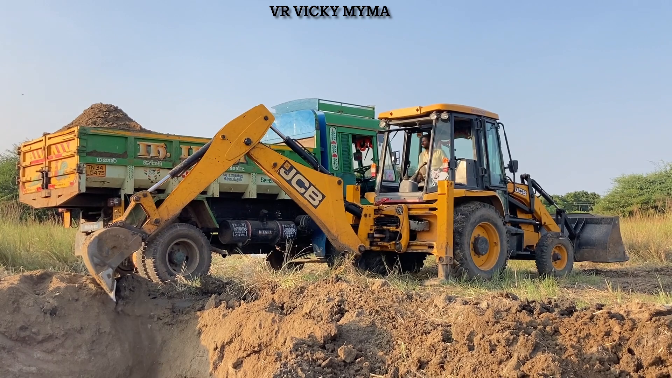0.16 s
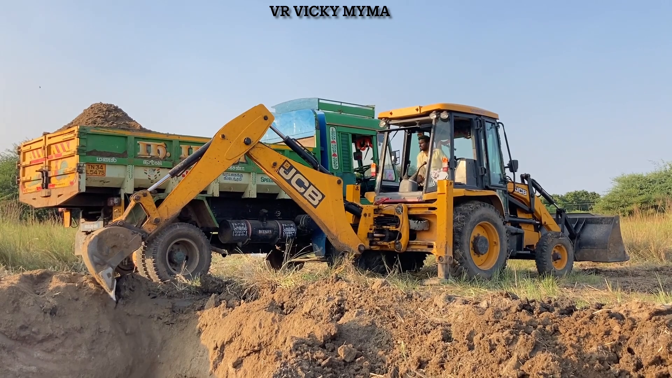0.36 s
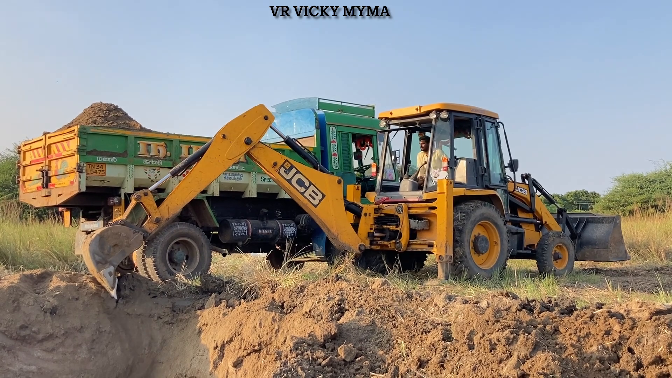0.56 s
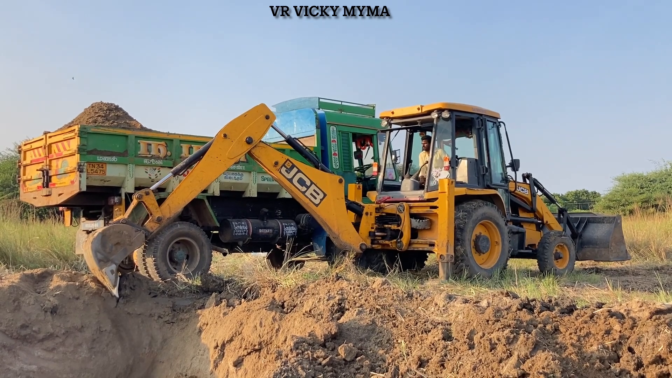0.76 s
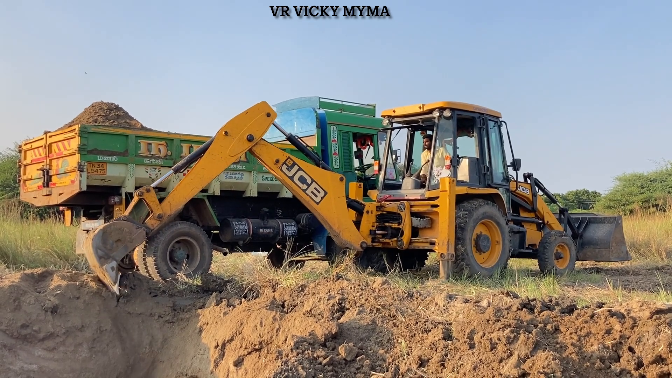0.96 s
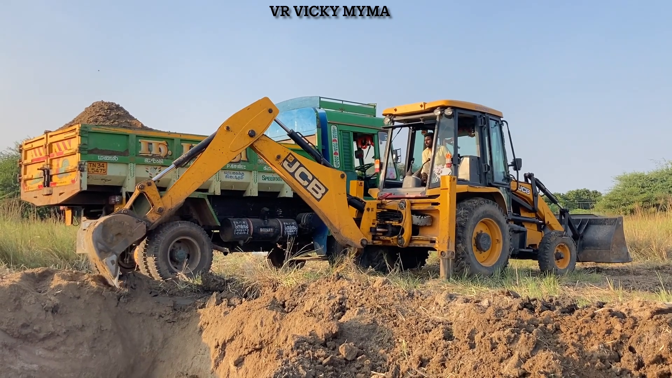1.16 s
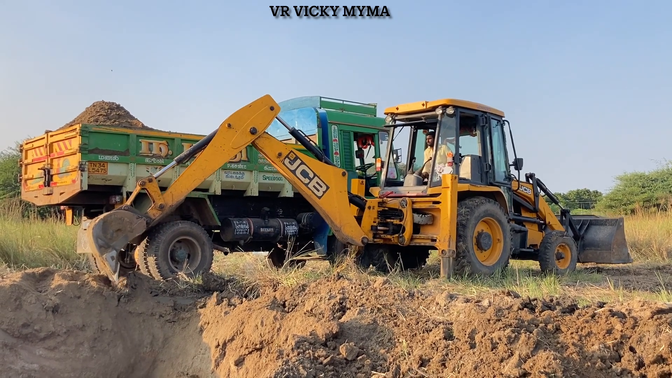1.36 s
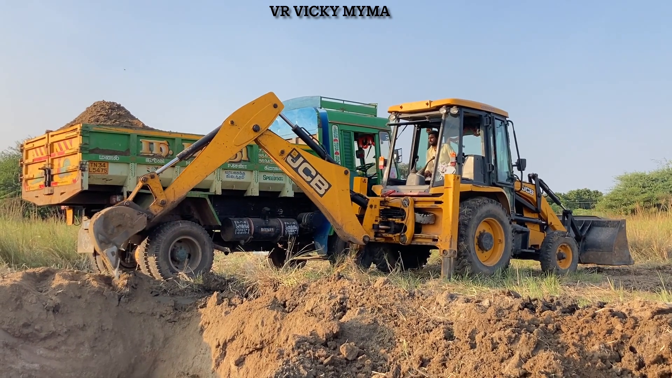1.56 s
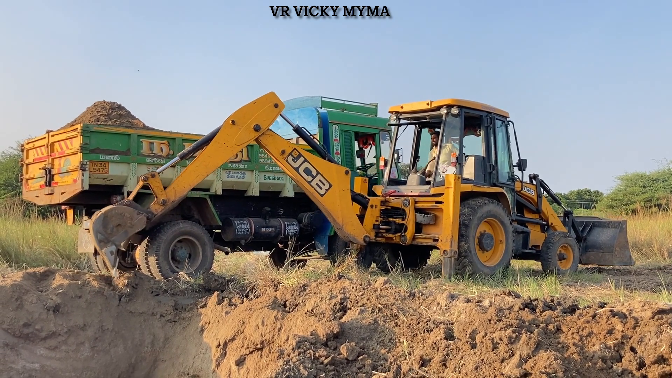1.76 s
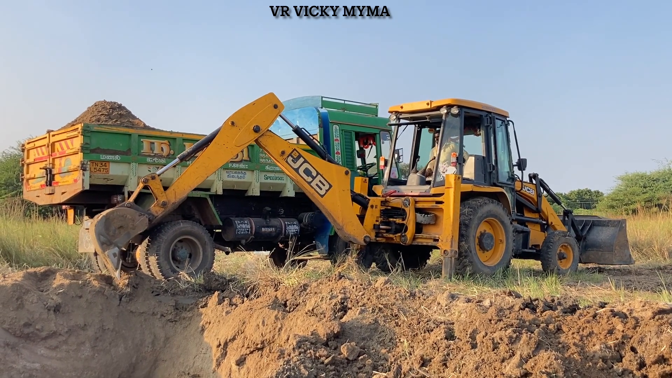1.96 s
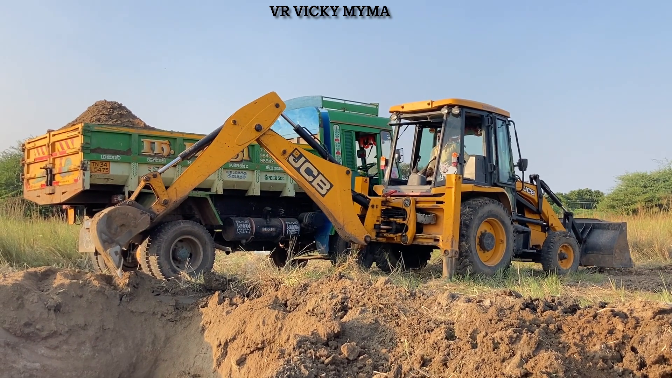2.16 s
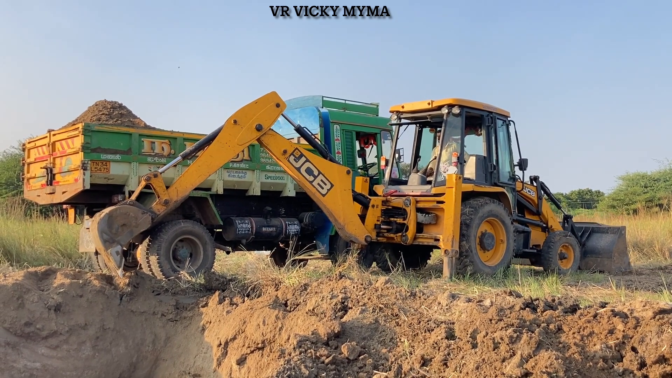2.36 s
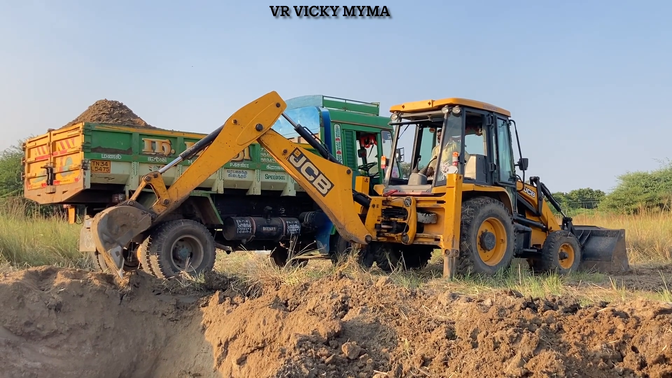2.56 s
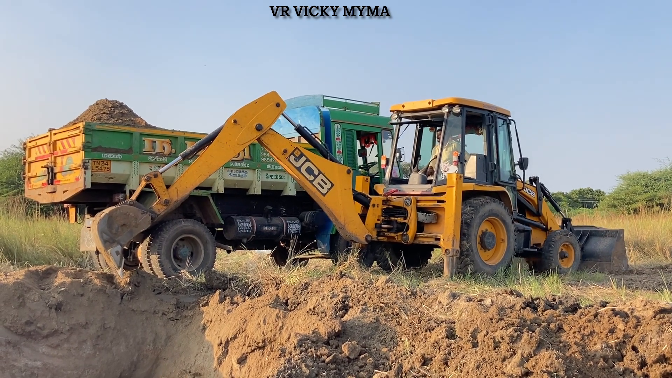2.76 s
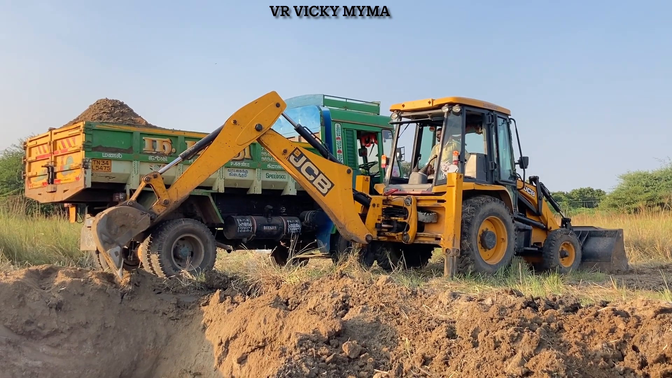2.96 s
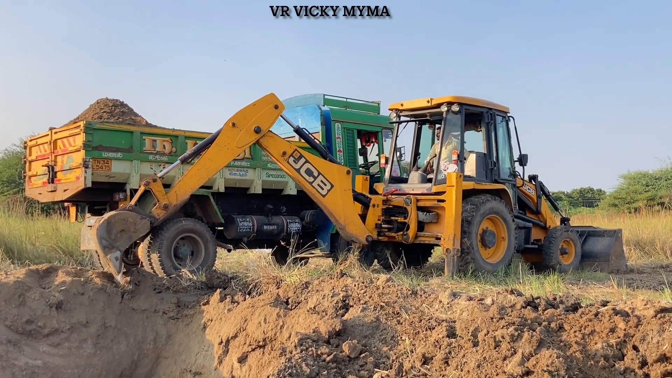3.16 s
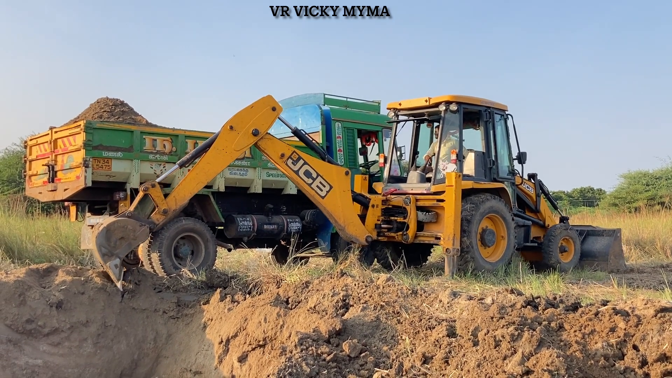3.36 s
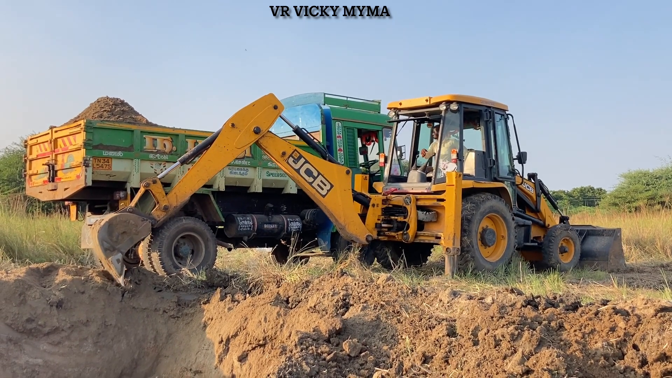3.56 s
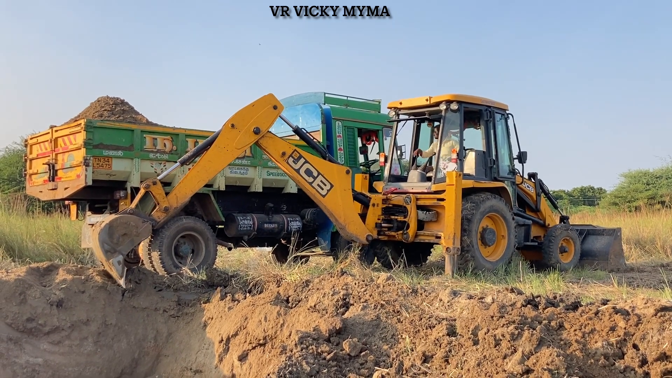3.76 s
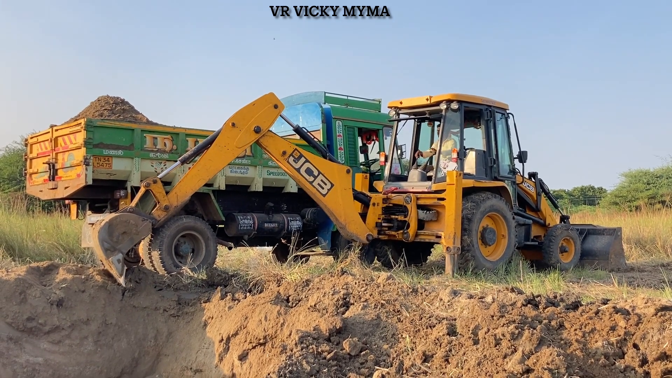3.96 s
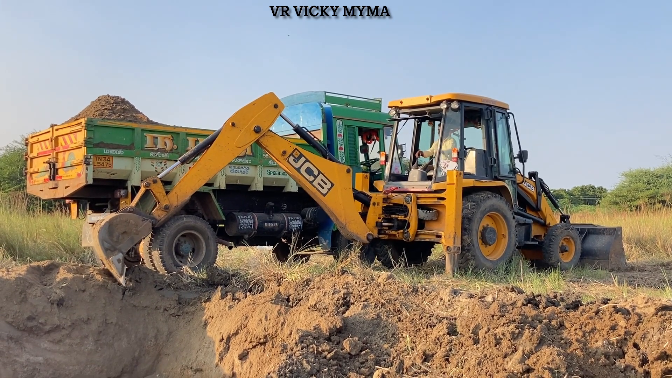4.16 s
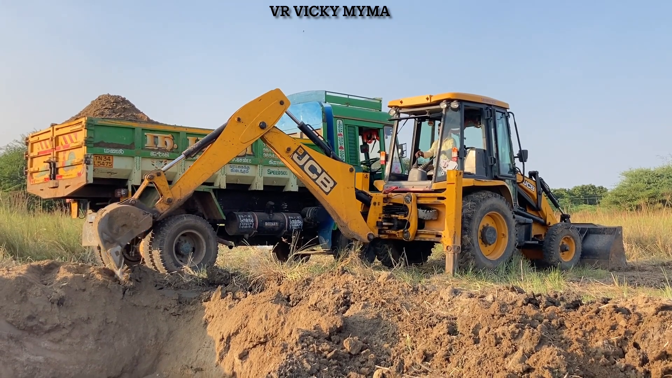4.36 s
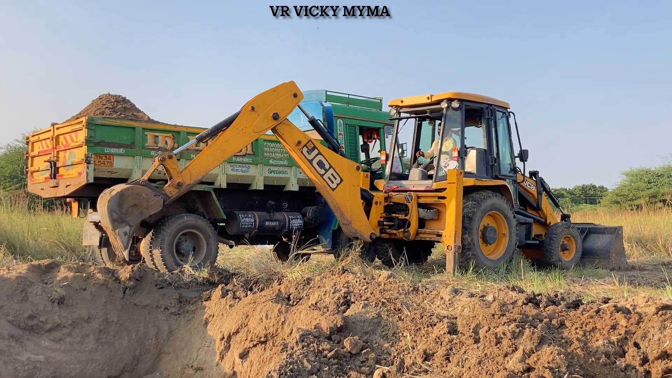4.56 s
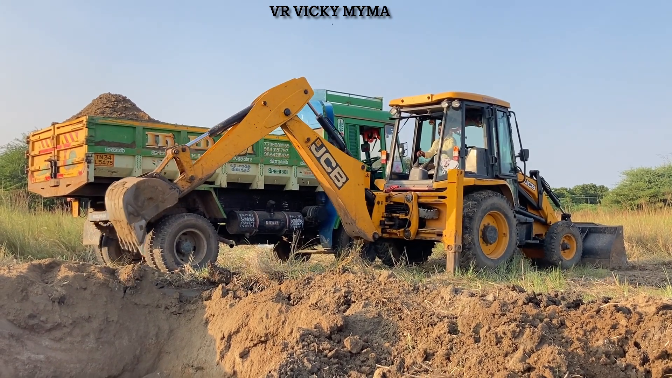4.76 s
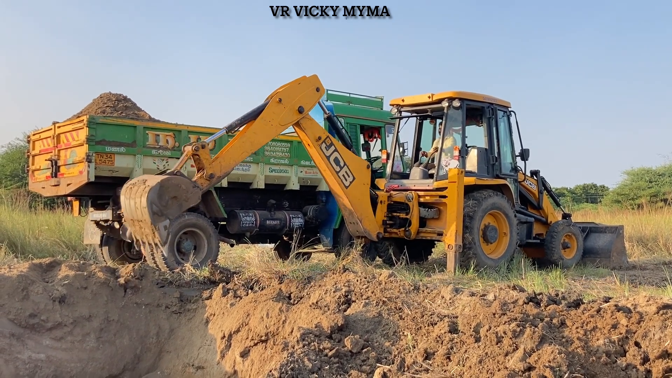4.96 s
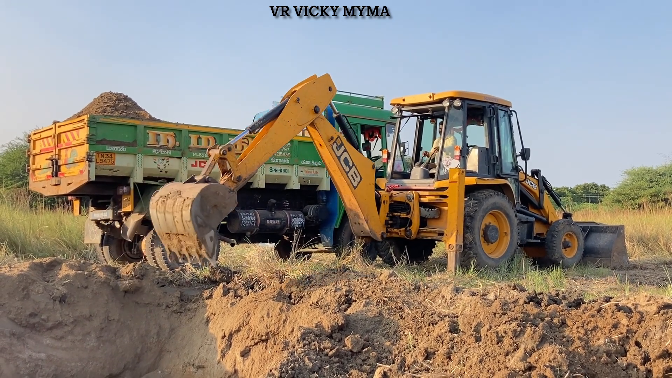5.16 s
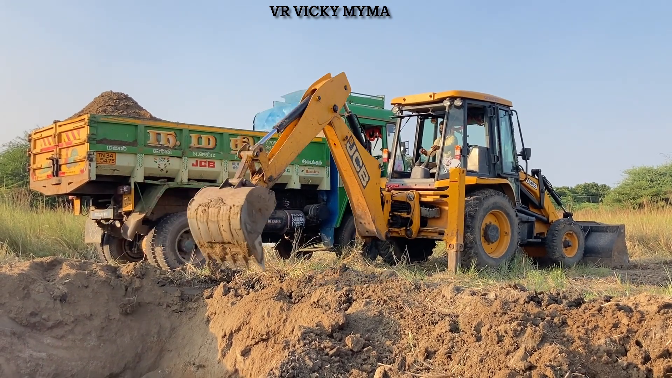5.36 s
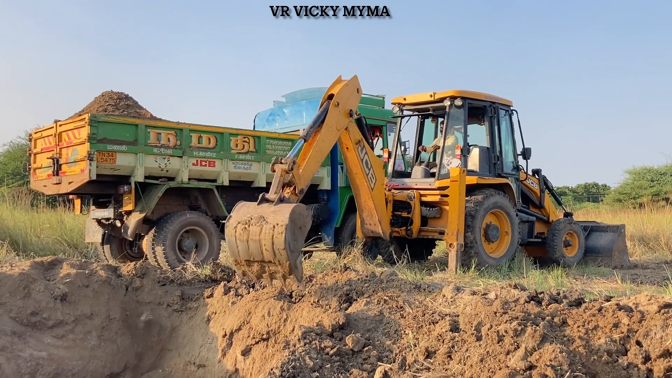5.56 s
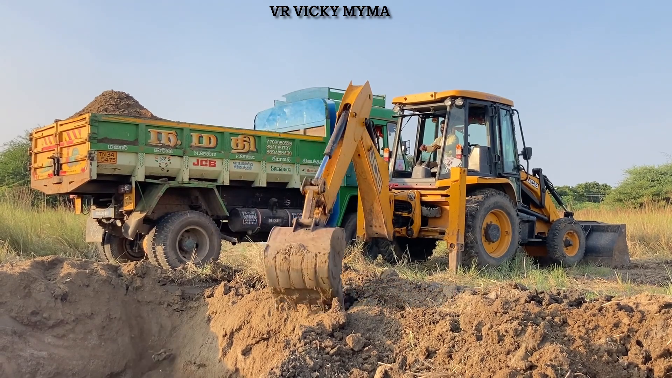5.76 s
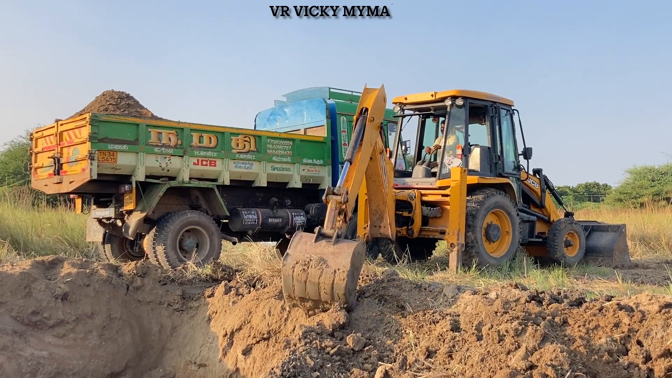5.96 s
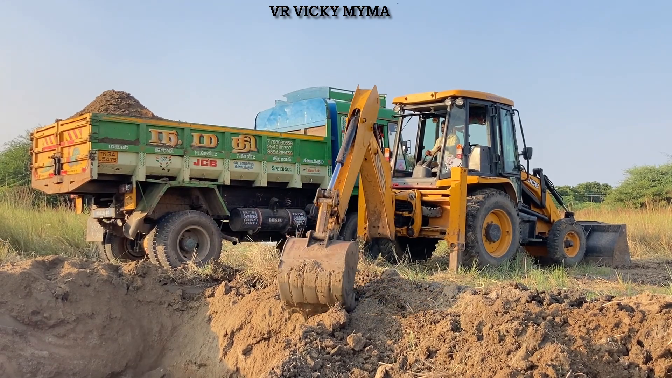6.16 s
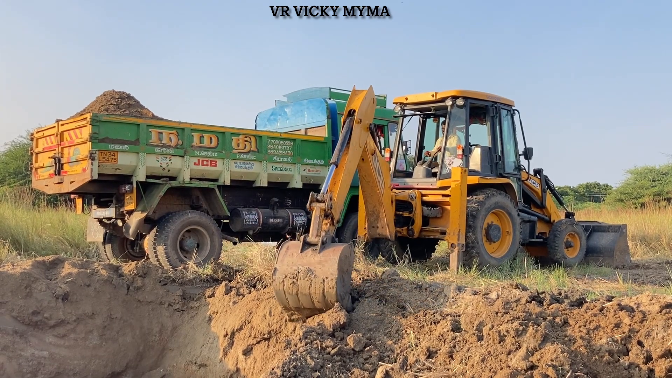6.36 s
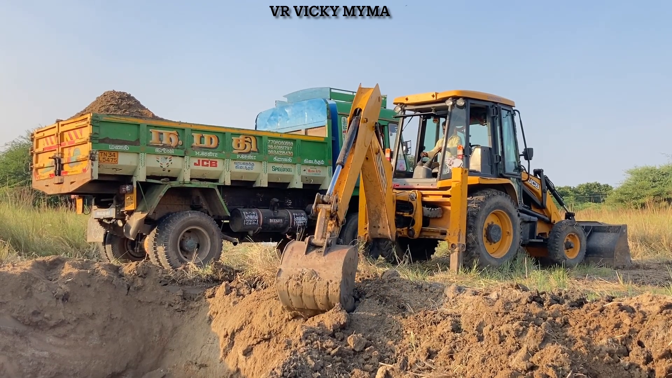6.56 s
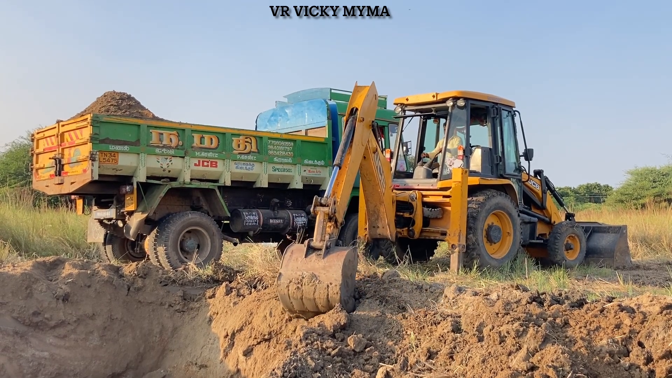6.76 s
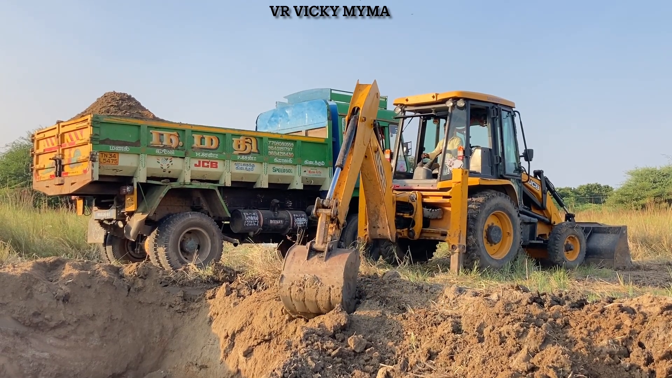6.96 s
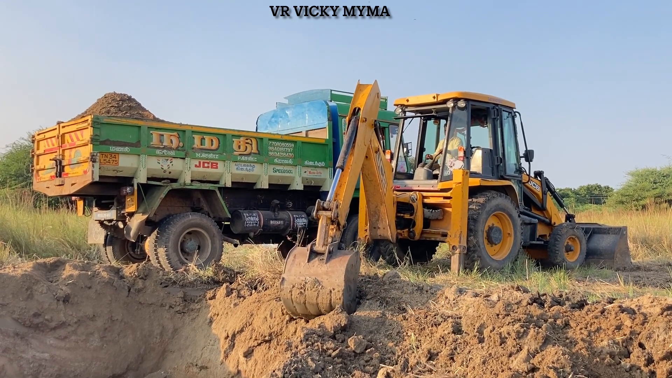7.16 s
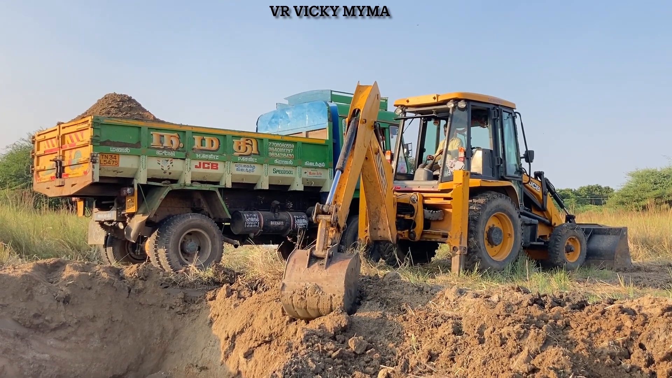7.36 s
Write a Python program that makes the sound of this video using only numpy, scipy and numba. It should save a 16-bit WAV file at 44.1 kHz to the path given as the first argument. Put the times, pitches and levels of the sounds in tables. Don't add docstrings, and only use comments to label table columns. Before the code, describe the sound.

Clattering diesel digger at work outdoors, revs dipping and surging, hydraulic hiss, small bucket knocks, then a loud metallic bang and gritty scraping.

```python
import sys
import numpy as np
from scipy import signal
from scipy.fft import rfft, irfft
from scipy.io import wavfile
from scipy.ndimage import uniform_filter1d
from numba import njit

SR = 44100
rng = np.random.default_rng(int(sys.argv[2]) if len(sys.argv) > 2 else 0)


def voltage_ratio(decibels):
    exponent = np.asarray(decibels, float) / 20
    return 10 ** exponent


def materialize(psi):
    bounded = np.clip(np.atleast_2d(psi).T, -1, 1)
    quanta = np.round(bounded * 32767).astype(np.int16)
    wavfile.write(sys.argv[1], SR, quanta)


N = 326781
SECONDS = np.arange(N) / SR

# exhaust puff in dB, block knock in dB.
CYLINDERS = [
    (2, -7),
    (2.5, -12.5),
    (0.5, -10),
    (4, -18),
]
# time in seconds, level in dB over idle.
LOAD = [(0.54, -8), (0.72, 6.5), (1.15, 6.5), (1.62, 18), (1.8, -5), (2.99, 1.5), (3.2, 14), (3.44, 17),
        (3.61, 11), (3.67, 3.5), (4.15, -9), (4.42, 12.5), (4.6, 14), (4.72, 4), (5.06, 15), (5.3, -2),
        (6.4, -0.5), (6.81, 14.5)]
# frequency in Hz, width in Hz, level in dB.
BUCKET_LOW = [(164, 7.1, -2), (211.8, 75, 0), (433, 137, 0), (528, 227, -2.5), (688, 48, -2), (751, 26, 0),
              (1052, 70, -2.5), (1272, 140, -6), (665, 500, -5.5)]
# frequency in Hz, width in Hz, level in dB.
BUCKET_HIGH = [(3200, 410, 8), (3775, 710, 8.5), (4040, 340, 8), (4200, 260, 4.5), (5200, 230, 2.5),
               (5900, 2400, -3.5), (6900, 960, -6), (10600, 6000, -34), (4170, 3100, -12)]


@njit
def svf(x, hz, width):
    y = np.empty(len(x))
    band, low = 0., 0.
    g, k = np.tan(np.pi * hz / SR), width / hz
    for i in range(len(x)):
        v = (band + g * (x[i] - low)) / (1 + g * (g + k))
        band = 2 * v - band
        low = low + 2 * g * v
        y[i] = k * v
    return y


def unit(x):
    return x / np.sqrt(np.mean(x ** 2))


def noise():
    return rng.standard_normal(N)


def grit(spread_db):
    return unit(noise() * voltage_ratio(spread_db * rng.exponential(size=N)))


def walk(rate):
    hold = int(SR / rate)
    steps = np.repeat(rng.standard_normal(N // hold + 1), hold)
    return 1.2 * uniform_filter1d(uniform_filter1d(steps, hold), hold)[:N]


def curve(table):
    times, values = np.transpose(table)
    return np.interp(SECONDS, times, values)


def gain_over_hz(hz, table):
    points_hz, points_db = np.transpose(table)
    return np.interp(np.log(hz), np.log(points_hz), points_db)


def swell(peak_s, rise_s, fall_s, db):
    return voltage_ratio(db) * np.interp(SECONDS, [peak_s - rise_s, peak_s, peak_s + fall_s], [0, 1, 0])


def swells(rows):
    return sum(swell(*row) for row in rows)


def ring(x, modes):
    return sum((-1) ** k * voltage_ratio(db) * svf(x, 1. * hz, 1. * width) for k, (hz, width, db) in enumerate(modes))


def pings(events, t60, size=2048, attack_s=0.0026):
    out, t = np.zeros(N + size), np.arange(size) / SR
    shape = 1000. ** (-t / t60) * np.minimum(t / attack_s, 1)
    for start_s, db, hz in events:
        at = int(start_s * SR)
        out[at:at + size] += voltage_ratio(db) * np.sin(2 * np.pi * hz * t) * shape
    return out[:N]


def effort(idle_db, per_load, rest_db):
    rest = np.interp(SECONDS, [1.93, 2.45, 2.65, 2.668], [0, 1, 1, 0])
    return idle_db + per_load * curve(LOAD) - rest_db * rest ** 2


def crank(firing_hz):
    worn_fires = [.876, 1.265, 1.422, 3.146, 3.464, 4.348, 4.505, 6.845, 7.086]
    turns = np.cumsum(firing_hz * (1 + .003 * walk(30))) / SR
    at = (np.array(worn_fires) * SR).astype(int)
    cycles = np.round(np.diff(turns[at], prepend=0) / len(CYLINDERS))
    slip = np.cumsum(cycles) * len(CYLINDERS) - turns[at]
    return turns + np.interp(np.arange(N), at, slip) + len(CYLINDERS)


def exhaust(firing_hz, turns):
    # peak in seconds, rise in seconds, fall in seconds, level in dB.
    lugs = [
        (.02, 0.073, 0.27, -36),
        (.75, 0.24, .2, -38),
        (1.68, 0.12, 0.18, -31),
        (3.6, 0.11, 0.13, -37),
        (7.2, .3, .3, -37),
    ]
    # frequency in Hz, width in Hz, level in dB under the second order.
    pipe = [(152, 44, -17.5), (212.5, 17, -17), (247, 10, -26), (294, 10, -26), (358, 32, -11),
            (550, 78, -17.5)]
    first_db, second_db = effort(-35.5, 0.53, 0.79), effort(-40.5, 1.04, .1)
    second_db = second_db + np.clip(-.3 * (second_db + 30), 0, 5) * walk(7)
    first_db = first_db + np.clip(-.35 * (first_db + 27), 0, 3) * walk(14)
    out = (voltage_ratio(first_db) + swells(lugs)) * np.sin(2 * np.pi * turns - 1.45)
    out = out + voltage_ratio(second_db) * np.sin(4 * np.pi * turns - 0.35)
    bark_db = 0.2 * (curve(LOAD) - 12)
    for order in range(3, 12):
        lift = sum(voltage_ratio(db) / (1 + (2 * (order * firing_hz - hz) / width) ** 2) for hz, width, db in pipe)
        level = lift * voltage_ratio(second_db + bark_db + 1.7 * walk(12))
        out = out + level * np.sin(2 * np.pi * order * (turns - .065))
    return out


def pump(turns):
    # peak in seconds, rise in seconds, fall in seconds, level in dB.
    strains = [
        (6.95, 0.33, 0.14, -30),
        (7.39, .1, .1, -31),
        (1.55, .1, .08, -37),
    ]
    hum_db = effort(-43, -0.35, .1) + 4.4 * walk(4.9)
    hum = voltage_ratio(hum_db) * np.sin(2 * np.pi * 6 * turns)
    return hum + swells(strains) * np.sin(2 * np.pi * 297 * SECONDS)


def block(turns, blow):
    # frequency in Hz, width in Hz, level in dB.
    panels = [(214, 12.2, -1.5), (348.2, 24.8, 0.5), (488, 69, -9), (560, 37, -9)]
    # frequency in Hz, width in Hz, level in dB.
    castings = [(697, 29, -3.5), (1036, 41, -5), (742, 21, -1), (955, 92, -1), (1413, 144, -9),
                (1990, 1060, -23.5)]
    # frequency in Hz, width in Hz, level in dB.
    covers = [(1753, 89, 0.5), (1920, 197, 3), (2290, 75, 3), (2500, 220, -1.5)]
    # frequency in Hz, width in Hz, level in dB.
    shroud = [(3540, 410, 4.5), (4070, 500, 2.5), (4900, 780, -2), (5860, 800, -3)]
    phase = turns % 1
    boom = (blow * np.exp(-phase / 0.23) + 0.29) * noise()
    clatter = (blow * np.exp(-phase / .15) + .4) * grit(1.8)
    tappets = (blow * np.exp(-phase / 0.067) + 2.0) * grit(1.4)
    boom_db = effort(-37, 0.13, 3.1)
    out = voltage_ratio(boom_db + 2.5) * unit(ring(boom, panels) + 0.056 * svf(boom, 594.0, 470.0))
    firing = turns.astype(int)
    kicks = np.diff(firing, prepend=firing[0]) * blow ** 2
    kick_db = boom_db - 4.5 + 0.28 * curve(LOAD) + 2 * walk(3.79)
    out = out + voltage_ratio(kick_db) * unit(svf(ring(kicks, panels[1:2]), 360.0, 260.0))
    clatter_db = effort(-39, 0.16, 1.6) + 1.0
    out = out + voltage_ratio(clatter_db) * unit(ring(clatter, castings) + 0.24 * svf(clatter, 1040.0, 680.0))
    tappet_db = effort(-45.5, 0.08, 1.8) - 3.5 + 0.49 * walk(13)
    out = out + voltage_ratio(tappet_db) * unit(ring(tappets, covers))
    fan_db = effort(-44, 0.032, 23.5) - 7.0 + 0.25 * walk(3.7)
    return out + voltage_ratio(fan_db) * unit(ring(tappets, shroud))


def worn_knocks():
    # start in seconds, peak in dB, frequency in Hz.
    knocks = [(0.277, -40, 909), (0.874, -31, 950), (1.067, -45, 746), (1.185, -25, 940),
              (1.262, -20.5, 960), (1.343, -31, 1010), (1.422, -36, 764), (1.639, -25.5, 1010),
              (2.767, -31, 1023), (2.99, -49, 720), (3.145, -25, 750), (3.224, -27, 760),
              (3.305, -24.5, 980), (3.385, -24.5, 1050), (3.48, -25, 1020), (3.545, -24, 970),
              (3.464, -17.5, 1007), (4.348, -30, 930), (4.388, -49, 950), (4.505, -21, 904),
              (4.567, -29, 950), (5.531, -50, 920), (6.844, -20, 910), (6.928, -25, 745), (7.005, -18, 950),
              (7.086, -17, 990)]
    return voltage_ratio(2.0) * pings(knocks, .045) * (1 + .3 * unit(svf(noise(), 120., 160.)))


def arm_pins():
    # start in seconds, peak in dB, frequency in Hz.
    chirps = [
        (2.6274, -30, 1995),
        (2.8023, -28, 2020),
    ]
    return voltage_ratio(4.5) * pings(chirps, 0.044, attack_s=0.0054)


def engine():
    # time in seconds, firing rate in Hz.
    speed = [(0.52, 54.7), (1.15, 50.99), (1.57, 50.42), (1.71, 53.3), (1.84, 60.0), (2.15, 54.3),
             (2.95, 53.28), (3.2, 50.7), (3.44, 50.6), (3.64, 54.9), (4.2, 55.23), (4.4, 51.57),
             (5.08, 51.13), (5.26, 53.58), (6.4, 53.6), (6.68, 49.8), (7.08, 50.16), (7.41, 52)]
    # deepest point in seconds, fall in seconds, recovery in seconds, part lost in dB.
    stumble = (2.19, .3, .4, -2)
    firing_hz = curve(speed)
    turns = crank(firing_hz)
    firing = turns.astype(int)
    puff_scatter, knock_scatter = rng.standard_normal((N // 500, 2))[firing].T
    puff_db, knock_db = np.array(CYLINDERS)[firing % len(CYLINDERS)].T
    uneven = voltage_ratio(uniform_filter1d(puff_db + .9 * puff_scatter, size=300))
    blow = voltage_ratio(knock_db + 2.2 * knock_scatter)
    tones = uneven * exhaust(firing_hz, turns) + pump(turns)
    tones = np.sqrt(2) * tones * (1 - swell(*stumble))
    return tones + block(turns, blow) + worn_knocks() + arm_pins()


def oil_flow():
    # peak in seconds, rise in seconds, fall in seconds, hiss in dB,
    # whistles over the hiss in dB.
    surges = [
        (3.1, 0.18, 0.21, -59, 2),
        (3.28, 0.019, 0.22, -50, 2.5),
        (4.97, 0.025, .12, -54.5, 3),
        (5.8, 0.86, 0.24, -60, 2),
        (6.035, 0.04, 0.045, -34.5, -5),
        (6.232, 0.016, 0.035, -43, 1),
        (5.958, .011, 0.03, -54, 0),
        (6.85, 0.37, 0.25, -53, 10.5),
        (7.05, 0.38, 0.056, -51.5, 6.5),
        (7.3, 0.4, 0.22, -55, 1),
    ]
    # frequency in Hz, width in Hz, level in dB.
    valves = [(6480, 4600, 4.5), (8260, 2700, 8), (11404, 800, 8)]
    # frequency in Hz, width in Hz, level in dB.
    reeds = [(6200, 120, -6), (6510, 110, 2), (6900, 19, 8), (7500, 90, -1), (7730, 18, -6.5)]
    flow = voltage_ratio(-52.5) + swells(row[:-1] for row in surges)
    pressure = voltage_ratio(-64.5) + sum(swell(*row[:-1]) * voltage_ratio(row[-1]) for row in surges)
    broad = svf(noise(), 8800.0, 21000.0)
    broad = broad - svf(broad, 2600.0, 10000.0)
    whistles = unit(ring(grit(0.83), valves)) + voltage_ratio(-5) * unit(ring(noise(), reeds))
    hiss = flow * unit(broad) + pressure * whistles
    for hz in (7600.0, 10000., 12400.0, 14900.0):
        hiss = hiss + flow * 0.23 * voltage_ratio(3.7 * walk(45)) * unit(svf(noise(), hz, 1800.))
    return voltage_ratio(1.5 + 0.28 * walk(5.0) + 1.3 * walk(60)) * hiss


def linkage_ticks():
    # start in seconds, peak in dB, frequency in Hz.
    ticks = [
        (.712, -37, 5200),
        (.778, -42, 5270),
        (1.6886, -29.5, 13040),
        (3.2715, -42, 6900),
        (4.299, -38, 7140),
        (5.226, -36, 6070),
        (5.243, -34, 6140),
        (5.244, -36, 7190),
    ]
    clicks = pings(ticks, 0.032, attack_s=.0003) * (1 + noise())
    return voltage_ratio(7.0) * svf(svf(clicks, 8400.0, 12000.0), 8400.0, 12000.0)


def hydraulics():
    # peak in seconds, rise in seconds, fall in seconds, level in dB.
    relief = [
        (7.26, .03, .27, -44),
    ]
    # peak in seconds, rise in seconds, fall in seconds, level in dB.
    slew = (5.8, .7, .2, -56)
    song = swells(relief) * unit(svf(noise(), 13100.0, 500.))
    breath = swell(*slew) * unit(svf(noise(), 12000., 1500.))
    return oil_flow() + song + breath + linkage_ticks()


def rumble():
    # peak in seconds, rise in seconds, fall in seconds, level in dB.
    gusts = [(0.72, 0.15, 0.2, -33.5), (.81, .04, 0.099, -29), (1.08, 0.18, 0.22, -30),
             (1.86, 0.41, 0.29, -26.5), (2.8, 0.88, 0.42, -35.5), (3.05, 0.049, 0.5, -32.5),
             (3.69, 0.16, 0.078, -49), (4.05, 0.11, 0.36, -43), (5.3, 1.9, 0.32, -41),
             (5.75, 0.053, 0.6, -35), (6.6, 0.22, 0.18, -41)]
    # peak in seconds, rise in seconds, fall in seconds, level in dB.
    eddies = [
        (.75, .2, .2, -28),
        (2.35, 0.52, 0.44, -38),
        (3.8, 0.64, 0.48, -34),
        (5.548, 0.26, 0.35, -35),
    ]
    calm = voltage_ratio(-42)
    wind = calm + swells(gusts)
    shared, own = noise(), noise()
    sides = [shared + 0.12 * own, shared - 0.12 * own]
    low = np.array([svf(svf(x, 86.0, 64.0), 86.0, 64.0) for x in sides])
    deep = np.array([svf(x, 61.0, 22.0) for x in np.roll(sides, shift=SR, axis=1)])
    deep = np.array([x - svf(x, 600.0, 1440.0) for x in deep]) * (calm + swells(eddies))
    upper = np.array([svf(svf(x, 151.0, 138.0), 151.0, 138.0) for x in sides])
    upper_gain = voltage_ratio(-35.5) * unit(wind) ** 0.25
    return voltage_ratio(24.5) * deep + voltage_ratio(2.0) * wind * unit(low) + upper_gain * unit(upper)


def blows(size=10000):
    # start in seconds, peak in dB, soil thud over
    # the plates in dB, bright edge over the plates in dB, rattle t60 in seconds.
    bucket_blows = [(0.709, -27.5, -3.5, -11, 0.16), (0.787, -30.5, -2, -18, 0.12), (1.4433, -33, 8, -19, 0.15),
                    (1.587, -32, 9.5, -16, 0.13), (1.6977, -36.5, 10, -23, 0.21), (1.931, -32, 6.5, -13, 0.19),
                    (1.9725, -33.5, 7.5, -22, 0.3), (2.934, -37, -19, -13, 0.068),
                    (3.041, -32.5, -13, -13, 0.04), (3.171, -38, -17.5, -6.5, 0.072),
                    (4.2084, -31, 7.5, -28, 0.26), (4.22, -35, 0, -16, 0.084), (4.2474, -45, 13, -27, 0.22),
                    (4.4324, -29.5, 7.5, -13.5, 0.15), (4.892, -30.5, 4, -25, 0.17),
                    (4.9759, -33.5, 6, -21, 0.29), (5.032, -31, 3, -15, 0.12), (5.0595, -35.5, 11.5, -26, 0.52),
                    (5.103, -36, 10.5, -14, 0.065),
                    (5.221, -24, 3, -11, 0.25), (5.235, -29, 6.5, -15, 0.26), (5.25, -22, -16, -21, 0.061),
                (5.5213, -37, -13, -13, 0.087), (5.8603, -34.5, 10.5, -31, 0.18),
                (5.9404, -38, 2, -23, 0.13), (5.947, -27.5, 6, -9.5, 0.32), (5.974, -13, 2, -22, 0.13),
                (5.993, -24.5, 8, -25, 0.26), (6.012, -29.5, 9.5, -9, 0.17), (6.033, -23, 0, -13, 0.15),
                (6.059, -32, 9, -28, 0.9), (6.084, -28, -17, -12.5, 0.094), (6.171, -35, -6.5, -18, 0.16),
                (6.2036, -31, -17, -13, 0.1), (6.2157, -16, 2.5, -15, 0.12), (6.235, -35, 11, -6, 0.14),
                (6.2743, -29.5, 7.5, -28, 0.17), (6.325, -35.5, 10, -22, 0.98), (6.487, -32, 0, -20, 0.2),
                (6.569, -52, -12, -25, 0.18), (6.712, -30, -1, -33, 0.21), (7.2404, -33, 3, -35, 0.56)]
    # frequency in Hz, width in Hz, level in dB.
    middle_plates = [(1386, 50.2, 5), (1570, 430, 2.5), (1837, 27, 7.5), (1950, 42, 2), (2280, 83, 5),
                     (2420, 150, 1), (2850, 260, -2.5), (1900, 650, -18.5)]
    # time in seconds, lag in ms.
    lag = [(0, 0.041), (5.0, 0.076), (5.25, 0.077), (5.9, 0.054), (7.41, .01)]
    out, t = np.zeros((2, N + size)), np.arange(size) / SR
    stones, soil, lag_ms = grit(2.6), grit(2.6), curve(lag)
    for start_s, db, low_db, high_db, t60 in bucket_blows:
        at = int(start_s * SR)
        fade = 1000. ** (-t / max(t60, .02)) * np.minimum(t / .0035, 1)
        rattle = np.resize(stones[at:], size) * fade
        crush = np.resize(soil[at:], size) * fade
        hit_plate = (1430 + 98 * rng.standard_normal(), 104, 7)
        middle = [hit_plate] + middle_plates
        sound = 0
        for modes, part_db in ((BUCKET_LOW, low_db - 6), (middle, -4.0), (BUCKET_HIGH, high_db + 4.5)):
            struck = [(hz, width, mode_db + 2.5 * rng.standard_normal()) for hz, width, mode_db in modes[:-1]]
            part = ring(rattle, struck) + .55 * ring(crush, modes[-1:])
            sound = sound + voltage_ratio(db + part_db) * part / np.sqrt(np.mean(part[:600] ** 2))
        out[0, at:at + size] += sound
        out[1, at:at + size] += np.interp(t - lag_ms[at] / 1000, t, sound)
    return np.array([side - 0.51 * svf(side, 5100., 900.) for side in out])[:, :N]


def scrape():
    # peak in seconds, rise in seconds, fall in seconds, level in dB.
    pulls = [(1.97, 0.055, 0.061, -46), (2.85, 0.16, 0.28, -42), (3.35, 0.32, 0.23, -39.5),
             (4.23, .03, 0.093, -46), (5.1, .12, .06, -43), (6.03, 0.056, 0.087, -27),
             (6.09, .04, .04, -31), (7.39, .08, .1, -37.5), (6.62, 0.17, 0.33, -38.5),
             (7.0, 0.33, 0.11, -33.5), (7.3, 0.046, 1, -30.5)]
    # frequency in Hz, width in Hz, level in dB.
    teeth = [(1003, 42, 7.5), (1590, 60, 1), (1817, 40, 7.5), (2269, 36, 5.5), (2470, 11, 3),
             (1900, 450, -2.5)]
    drag = ring(grit(2.8), teeth) + 0.078 * ring(grit(2.6), BUCKET_HIGH)
    drag = drag + 0.75 * ring(grit(2.6), BUCKET_LOW[2:])
    return swells(pulls) * voltage_ratio(1.4 * walk(25)) * unit(drag)


def clanks():
    # start in seconds, peak in dB, frequency in Hz.
    plates = [(1.735, -19, 148.8), (5.3, -42, 1430), (5.7, -32, 1115), (6.11, -29, 1440), (6.15, -25, 1460),
              (6.3, -27, 894), (6.34, -27, 970), (.710, -27, 1800), (.711, -30, 2420), (.79, -32, 1460),
              (.79, -44, 3570), (5.035, -38, 1750), (5.24, -22, 2410), (4.222, -36, 1570), (4.25, -25, 817),
              (4.262, -31, 803), (5.05, -37, 2350), (5.86, -24, 686), (5.975, -12.5, 1440),
              (6.219, -28, 1900), (5.976, -17, 1920), (6.204, -28, 2280), (6.77, -21.5, 542),
              (7.0, -22.5, 551), (7.24, -30, 2280)]
    # start in seconds, peak in dB, frequency in Hz.
    arm = [
        (5.27, -33, 164),
        (5.98, -30.5, 159.6),
    ]
    return pings(plates, 0.13, size=8192, attack_s=0.0019) + pings(arm, 2.9, size=SR, attack_s=0.022)


def stone_taps():
    # start in seconds, peak in dB, frequency in Hz.
    taps = [(3.044, -32, 2130), (3.18, -28, 1270), (5.235, -24, 2980), (5.27, -21, 1120), (.716, -20, 930),
            (5.524, -34, 2330), (5.73, -39, 3620), (5.735, -26, 1049), (6.716, -28, 1806), (.73, -31, 2360),
            (.742, -36, 2450), (.742, -31, 1800), (4.232, -28, 1550), (5.226, -21, 2360),
            (5.244, -31, 4000), (5.262, -24.5, 3340), (5.861, -30, 1100), (5.978, -13, 2250),
            (6.004, -21, 2400), (6.012, -20, 1450), (6.014, -27, 3600), (6.033, -19, 1500),
            (6.03, -10, 720), (6.04, -25, 2500), (6.055, -35, 3670), (6.085, -22, 1520), (6.221, -25, 3980),
            (6.245, -25, 2280), (6.278, -25, 1900), (1.931, -34, 1776), (1.944, -27, 1020),
            (1.953, -31, 1460), (1.978, -27.5, 795), (1.982, -39, 2500), (4.213, -27, 870),
            (4.219, -34, 1610), (4.221, -35, 3140), (4.213, -31, 2350), (.875, -28, 896),
            (1.592, -31, 1980), (1.738, -25, 420), (4.966, -30, 1000), (5.087, -32, 2500),
            (4.444, -34, 2410), (4.438, -28, 899), (4.891, -36, 2360), (4.978, -31, 1900),
            (5.034, -22, 1730), (5.053, -32, 2340), (5.061, -28, 1751), (5.086, -24, 1500),
            (5.106, -34, 3400), (5.118, -31, 1500), (5.231, -14, 505), (5.254, -16, 923), (5.94, -37, 1490),
            (6.965, -41.5, 4785), (7.012, -32, 5250), (7.0, -37, 4240)]
    return pings(taps, 0.057) * (1 + 0.37 * unit(svf(grit(2.6), 150., 250.)))


def bucket():
    return blows() + scrape() + clanks() + stone_taps()


def ports(pair):
    # frequency in Hz, left minus right in dB.
    port_tilt = [(50, -2), (500, -.8), (1400, 1.6), (1900, 3), (2400, 1.5), (4000, -.5), (16000, 0)]
    hz = np.fft.rfftfreq(N, 1 / SR) + 1
    left, right = rfft(pair)
    high = 1 / (1 + (5780 / hz) ** 24)
    turned = left * np.exp(2j * np.pi * (hz - 6876) / 4550)
    tilt = voltage_ratio(gain_over_hz(hz, port_tilt) / 2)
    return irfft(np.array([left * tilt, (right * (1 - high) + turned * high) / tilt]), N)


def reflections(x):
    # frequency in Hz, level in dB under the direct sound.
    diffuse = [(40, -12.5), (400, -18.5), (1200, -12.5), (2500, -4.5), (5000, -5.5), (6300, 0.5),
               (7600, -18), (8500, -36)]
    t = np.arange(4096) / SR
    fade = 1000. ** (-t / 0.028)
    smears = [unit(rng.standard_normal(len(t)) * fade) / np.sqrt(len(t)) for _ in range(2)]
    hz = np.fft.rfftfreq(N, 1 / SR) + 1
    echo = rfft(smears, N)
    even_echo = echo / np.sqrt(np.abs(echo) ** 2 + .1)
    truck, banks = irfft(rfft(x) * even_echo * voltage_ratio(gain_over_hz(hz, diffuse)), N)
    angle = 2 * np.pi * .3 * walk(14)
    return (truck * np.cos(angle) + banks * np.sin(angle)) * np.array([[1], [-1]])


def scene():
    motor = engine() + hydraulics()
    direct = np.array([np.roll(motor, shift=1), motor]) + bucket()
    direct = np.array([side - 0.22 * svf(side, 3084., 117.) for side in direct])
    return ports(direct + rumble()) + reflections(direct.mean(axis=0))


def roll_off(x):
    return signal.sosfilt(signal.butter(12, 15800, fs=SR, output="sos"), x)


def record(dry):
    rounded = np.tanh(0.7 * dry) / 0.71
    x = signal.sosfilt(signal.butter(3, 34, "highpass", fs=SR, output="sos"), rounded)
    x = signal.sosfilt(signal.ellip(10, .2, 60, 15850, fs=SR, output="sos"), x)
    return roll_off(x)


dry = scene()
out = record(dry)
materialize(out)
```